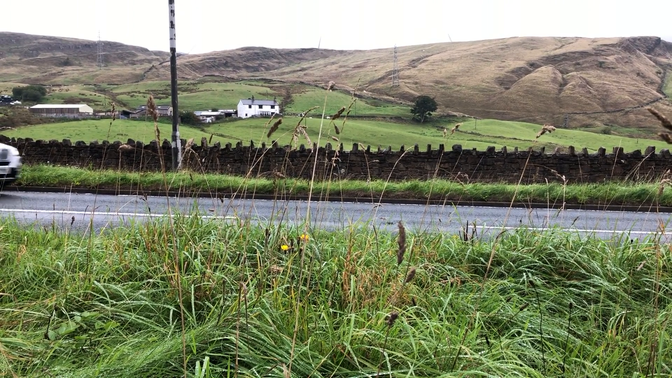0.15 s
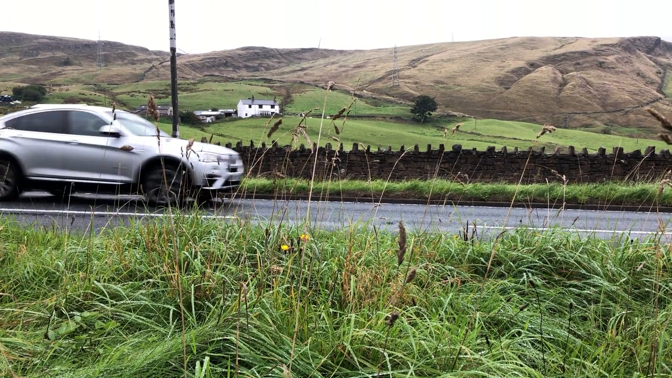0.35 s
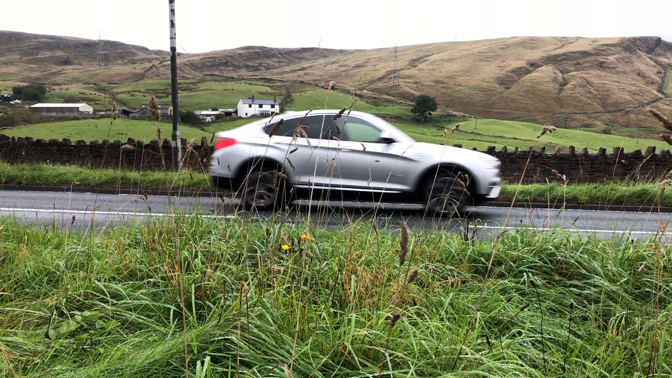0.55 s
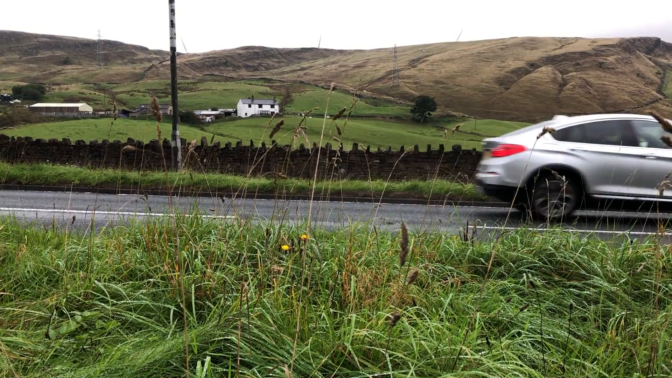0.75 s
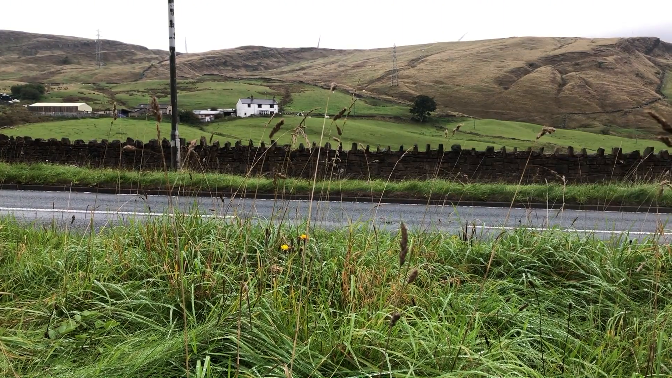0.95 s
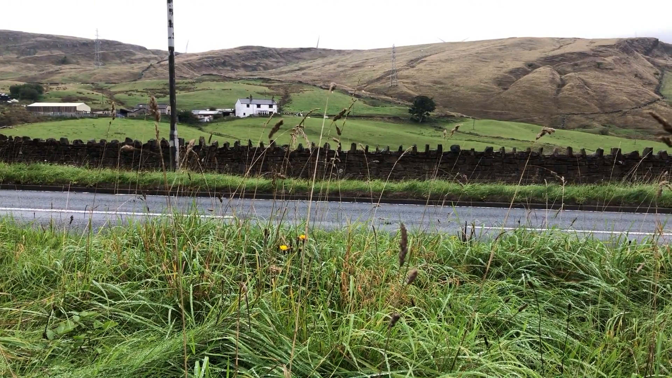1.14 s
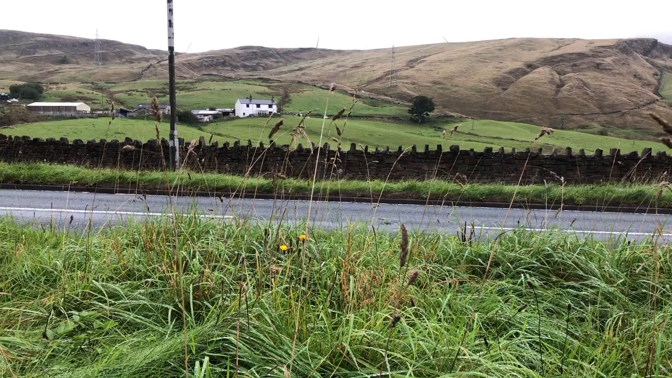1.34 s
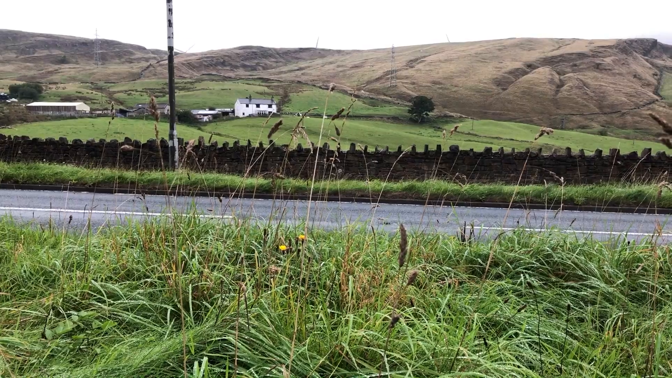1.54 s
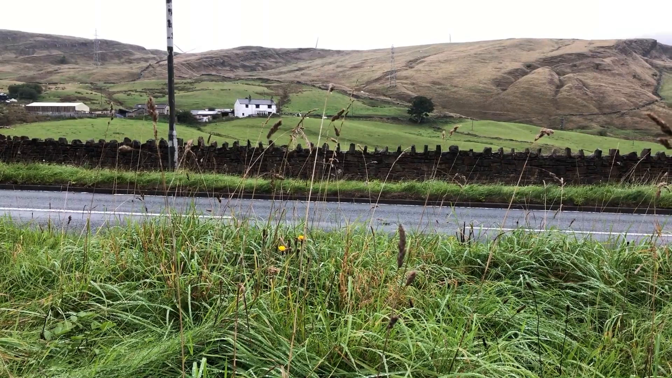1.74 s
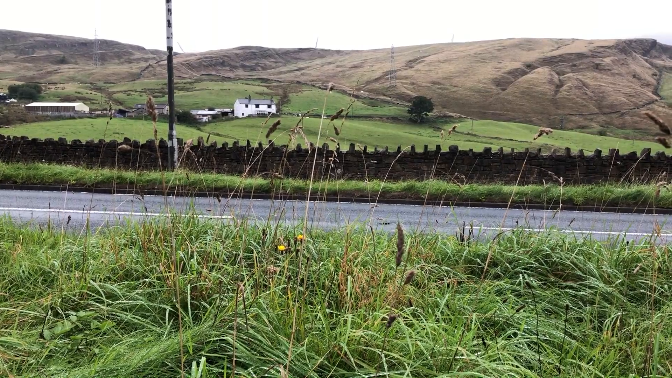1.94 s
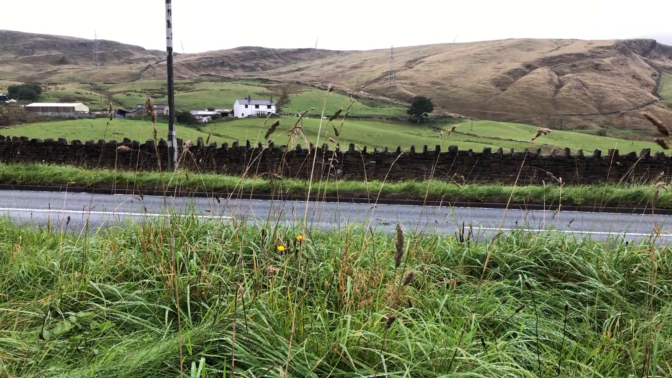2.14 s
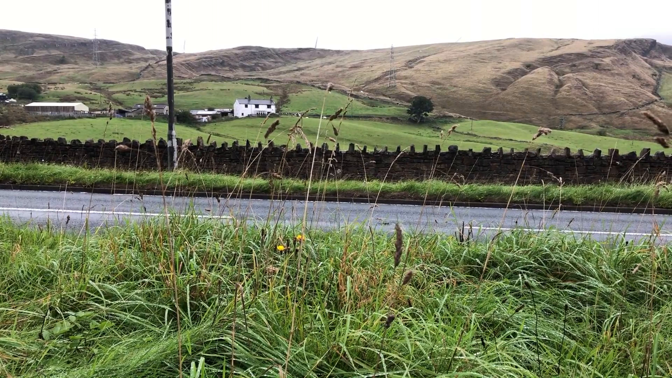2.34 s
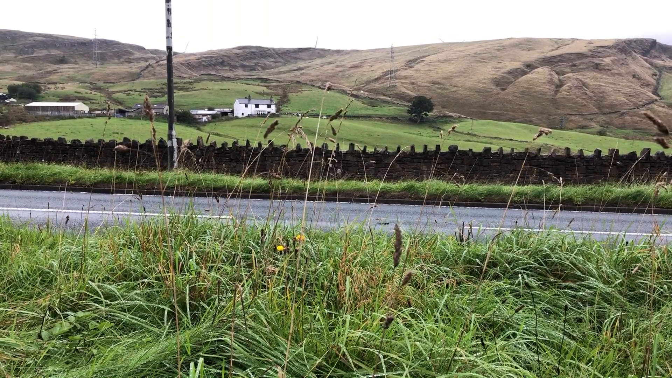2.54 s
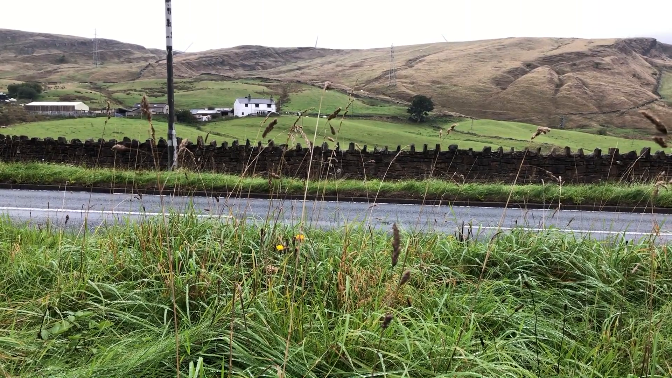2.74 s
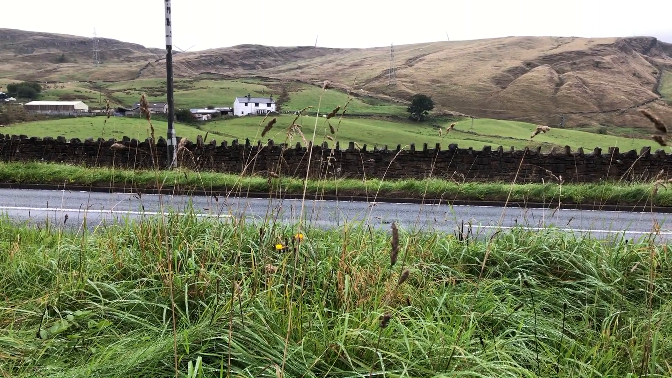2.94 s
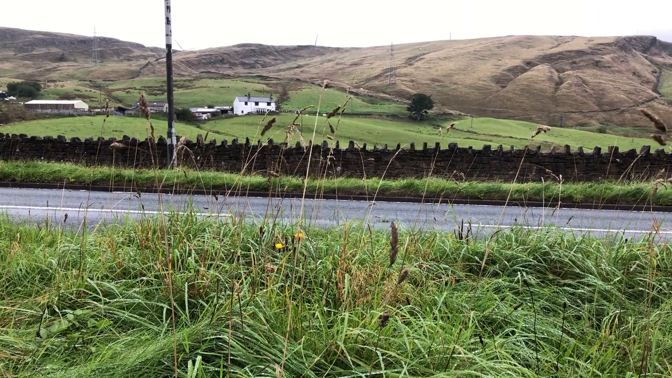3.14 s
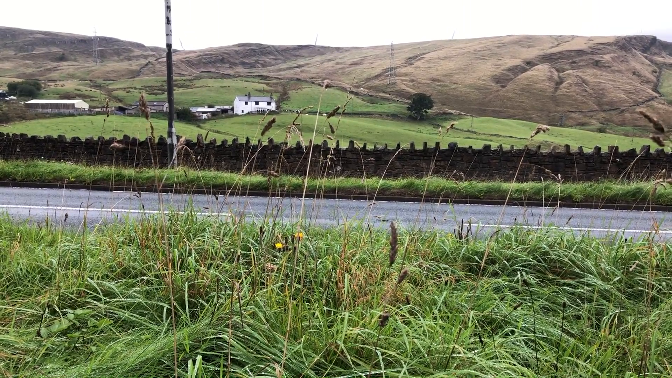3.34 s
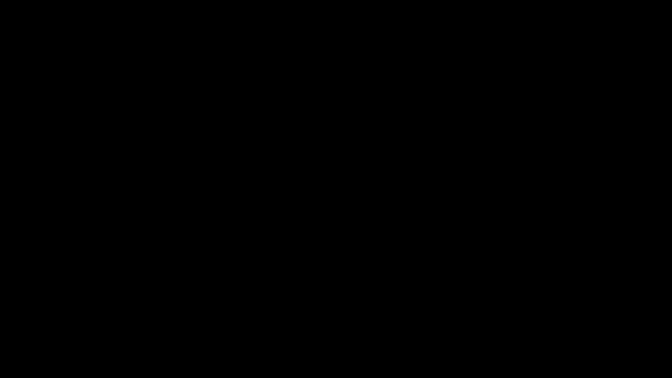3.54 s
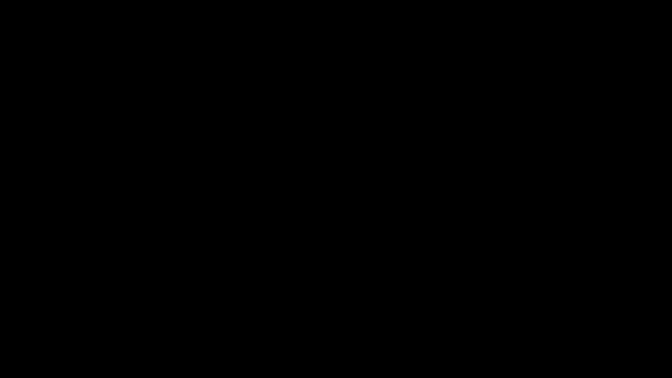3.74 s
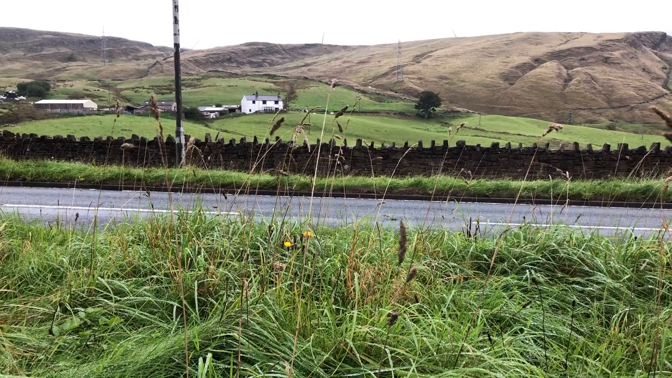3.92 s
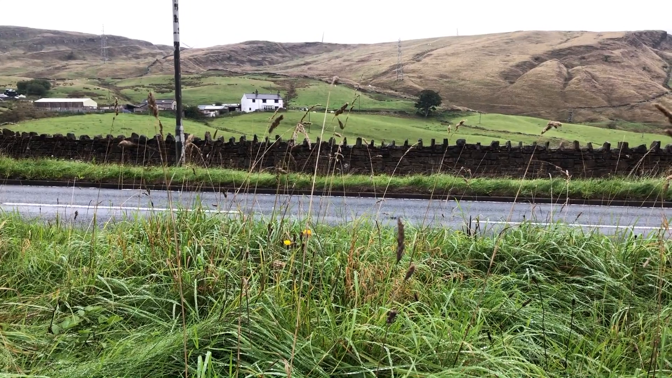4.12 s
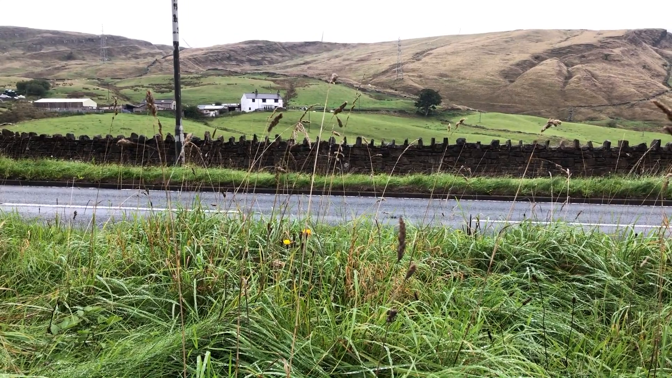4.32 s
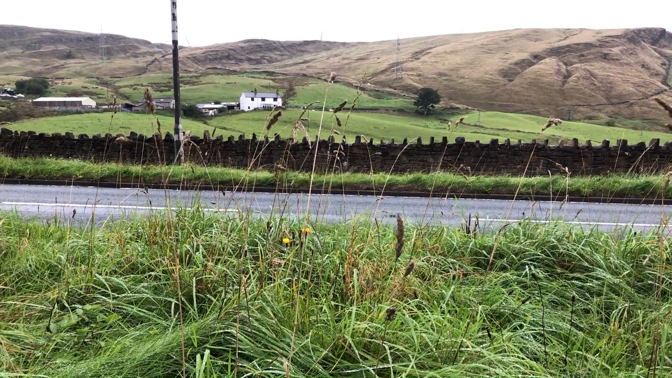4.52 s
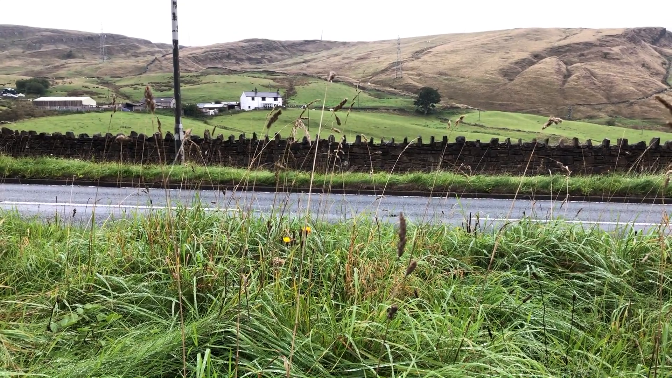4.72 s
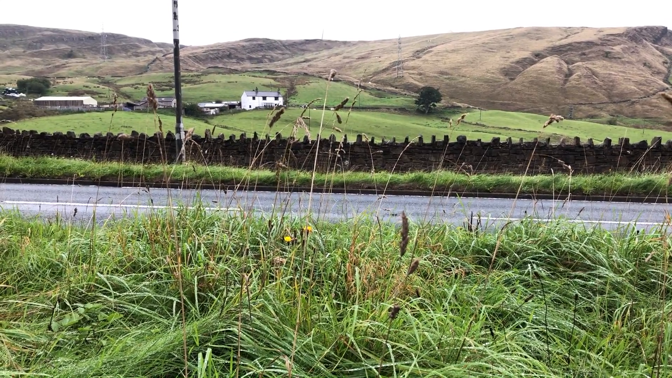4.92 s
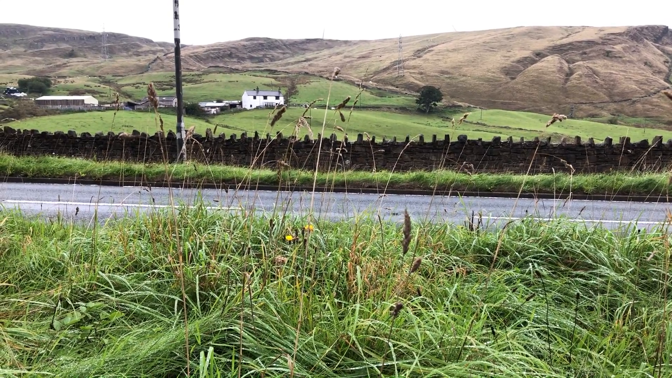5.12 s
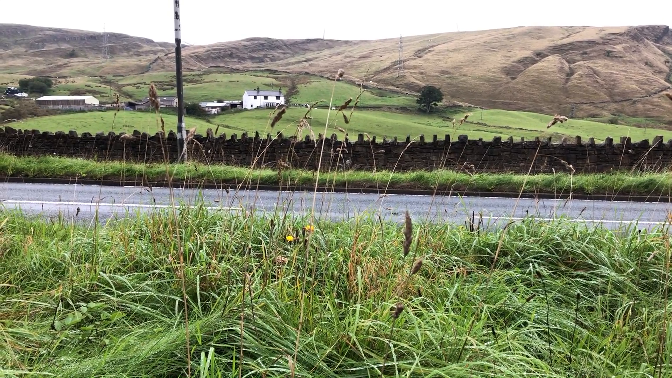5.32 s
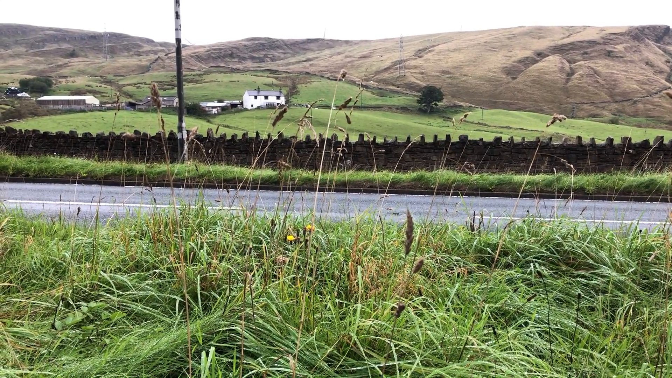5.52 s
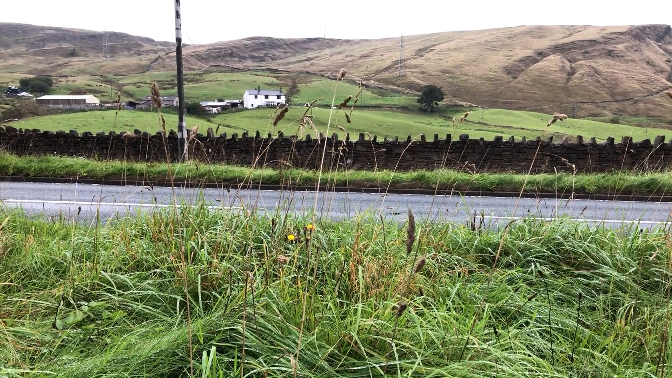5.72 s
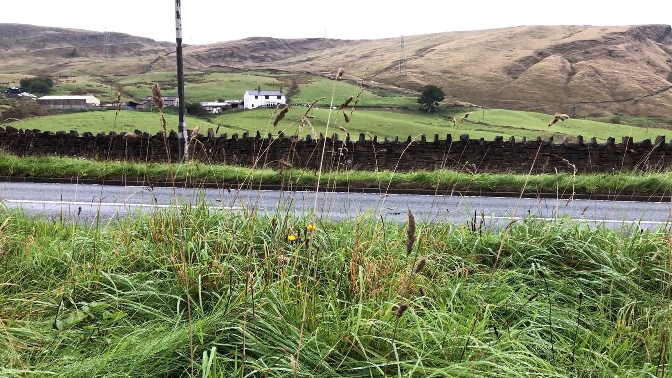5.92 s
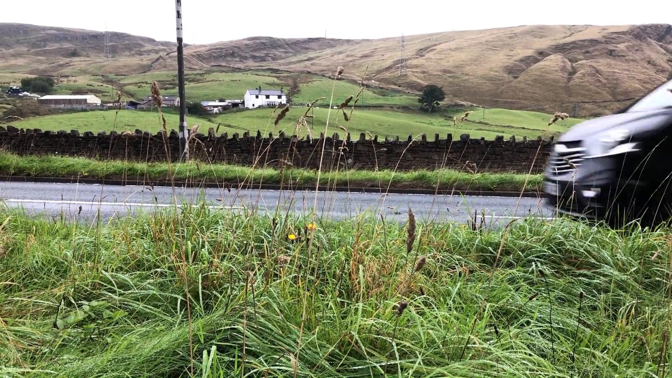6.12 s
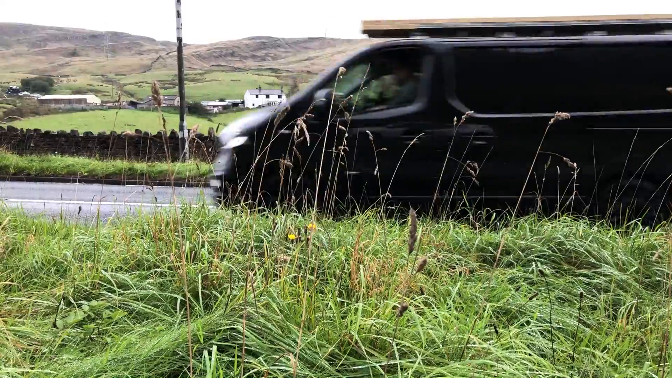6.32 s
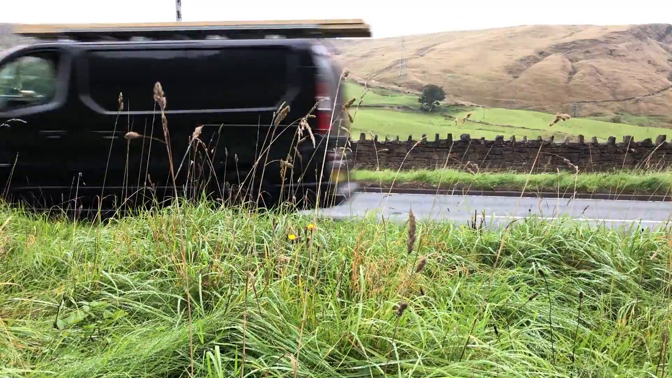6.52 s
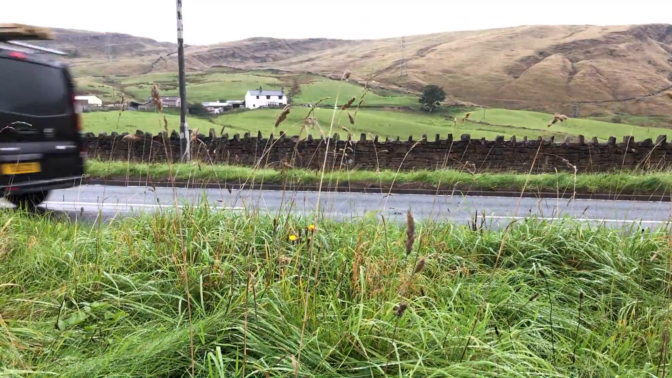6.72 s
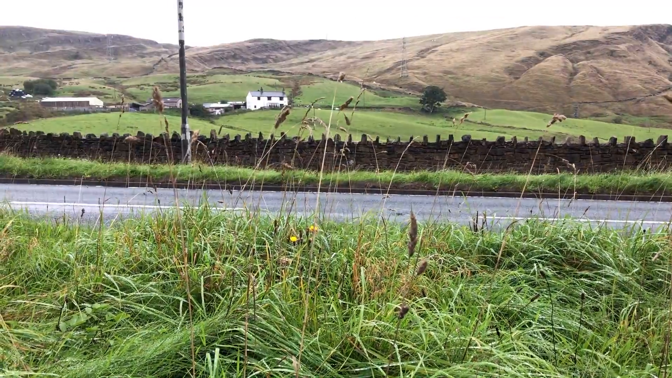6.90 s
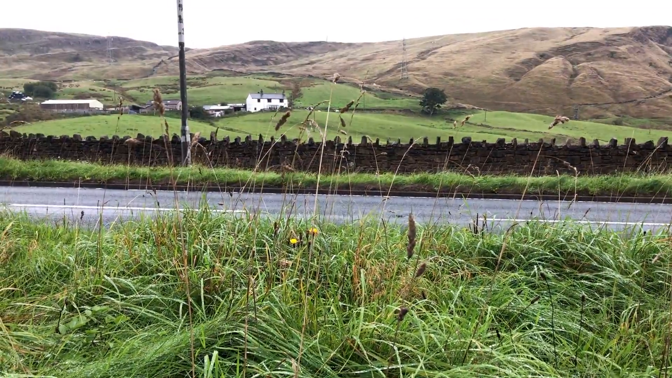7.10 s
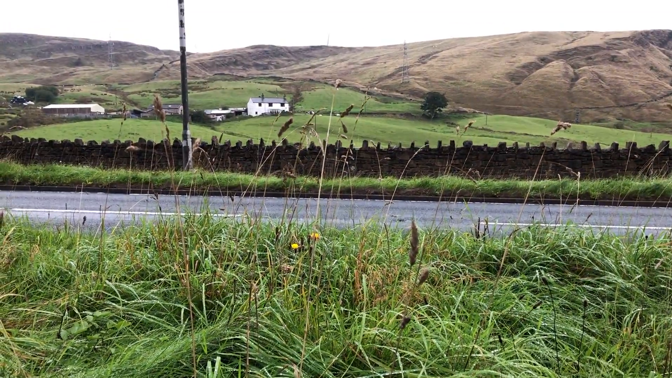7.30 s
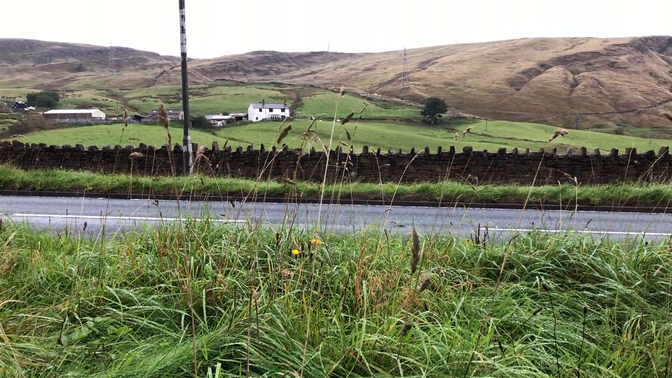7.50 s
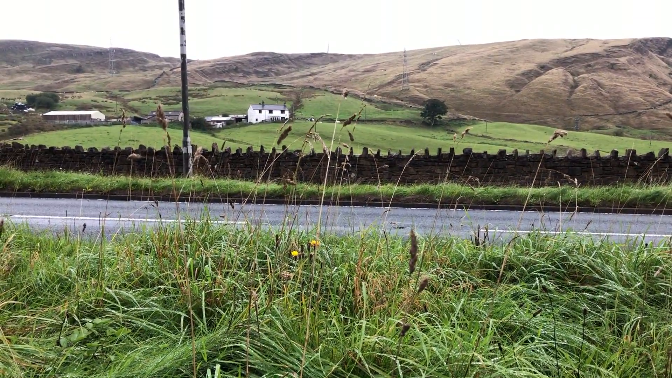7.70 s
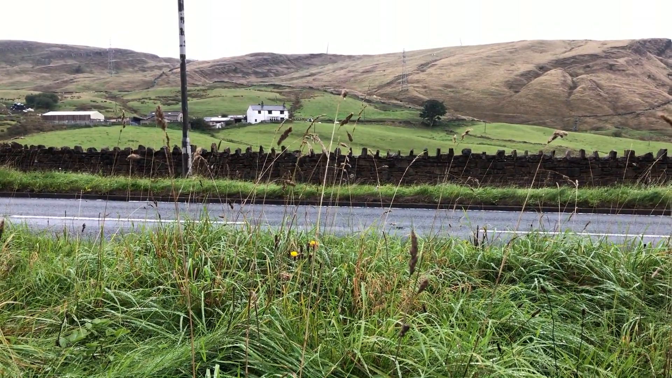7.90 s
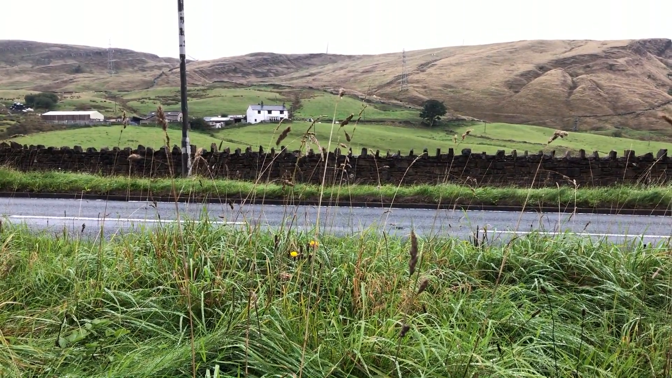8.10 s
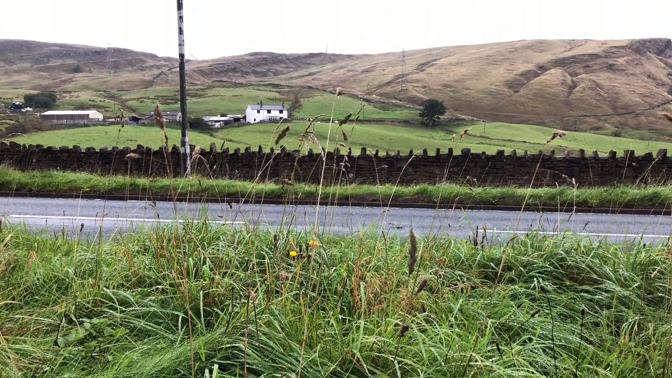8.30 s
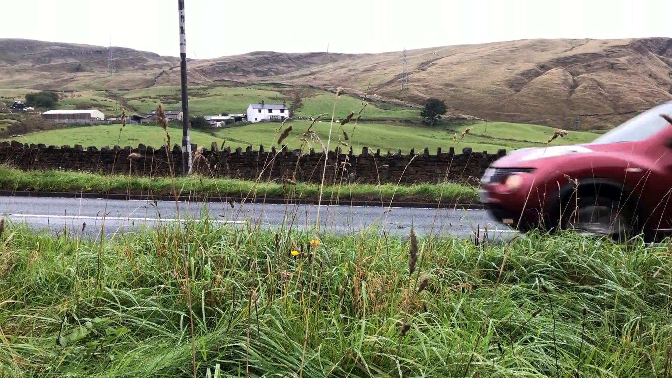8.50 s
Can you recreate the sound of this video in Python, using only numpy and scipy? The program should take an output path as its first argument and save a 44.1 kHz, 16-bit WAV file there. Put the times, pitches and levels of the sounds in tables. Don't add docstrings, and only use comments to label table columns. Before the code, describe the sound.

Roadside on wet tarmac: three vehicles in turn swish by with low rumble, droning engines and hissing spray, a few drops ticking between.

```python
import sys
import numpy as np
from scipy import signal
from scipy.io import wavfile
from scipy.ndimage import uniform_filter1d

SR = 44100
rng = np.random.default_rng(int(sys.argv[2]) if len(sys.argv) > 2 else 0)


def linear_from_db(decibels):
    return 10 ** (np.asarray(decibels, float) / 20)


def materialize(psi):
    bounded = np.clip(np.atleast_2d(psi).T, -1, 1)
    quanta = np.round(bounded * 32767).astype(np.int16)
    wavfile.write(sys.argv[1], SR, quanta)


N = 377055
STEP = 64
CAR, VAN, SECOND_CAR = 0, 1, 2


def drift(rate_hz, size):
    r = np.exp(-2 * np.pi * rate_hz * STEP / SR)
    slow = signal.lfilter([1], [1, -2 * r, r * r], rng.standard_normal(size + 1000))[1000:]
    return slow / slow.std()


# (abreast [s], speed [m/s], nearest distance [m])
PASSES = [
    (0.6, 19, 5.91),
    (6.45, 17, 5.8),
    (8.75, 19, 3.57),
]
# (time [s], size of the drop [dB], time scale of the step [s], negative =
LEVEL_STEPS = [
    (3.97, 8, .045),
    (4.27, 13, -.065),
    (0, 0, 1),
]


def heard_db(vehicle, rule, t):
    abreast_s, speed, near_m = PASSES[vehicle]
    step_s, step_db, fade_s = LEVEL_STEPS[vehicle]
    top_db, lag_s, coming, going, loss_db = rule
    since = t - abreast_s - lag_s
    spread_db = 10 * np.log10(1 + (speed * since / near_m) ** 2)
    power = np.where(since < 0, coming, going)
    lowered = .5 + .5 * np.tanh(.5 * (t - step_s) / fade_s)
    return top_db - power * spread_db - loss_db * np.abs(since) - step_db * lowered


def doppler_phase(vehicle, hz):
    sound_m_per_s = 343
    abreast_s, speed, near_m = PASSES[vehicle]
    along = speed * (np.arange(N) / SR - abreast_s)
    leaving_speed = speed * along / np.hypot(along, near_m)
    return 2 * np.pi * np.cumsum(hz / (1 + leaving_speed / sound_m_per_s)) / SR


def colour(since, hz, when, spectra):
    shades = []
    for points in spectra:
        point_hz, point_db = np.transpose(points)
        shades.append(np.interp(np.log(hz), np.log(point_hz), point_db))
    return np.array([np.interp(since, when, band) for band in np.transpose(shades)])


LAYER_EDGES = [55, 350, 780, 3000, 15500]


def vehicle_bands(vehicle, rules, roll, spray, t, hz, wide):
    join = np.searchsorted(hz, LAYER_EDGES[3]) - 1
    spray_joined = spray[join:] - spray[join] + roll[join]
    shape = np.r_[roll[:join], spray_joined] + 10 * np.log10(wide)[:, None]
    layer_of = np.clip(np.searchsorted(LAYER_EDGES, hz) - 1, 0, len(rules) - 1)
    lift = []
    for k, rule in enumerate(rules):
        layer_power = np.sum(linear_from_db(2 * shape[layer_of == k]), axis=0)
        lift.append(heard_db(vehicle, rule, t) - 10 * np.log10(layer_power))
    smooth_lift = uniform_filter1d(np.array(lift)[layer_of], size=5, axis=0, mode="nearest")
    return linear_from_db(2 * (shape + smooth_lift))


# (frequency [Hz], level [dB per Hz])
CAR_NEAR = [(18, -54), (30, -24), (49, -23), (92, -3), (140, -2), (180, -4), (240, 0), (404, -12.5),
            (595, -14), (926, -9), (1290, -11.5), (1930, -15), (3000, -27), (3900, -55), (6600, -120)]
CAR_LEAVING = [(18, -53), (30, -17), (53, -22), (92, -8.5), (210, -1), (286, -6), (353, -11.5), (595, -18),
               (874, -9), (1390, -9), (1720, -11.5), (2250, -21), (3000, -22.5), (3900, -54), (6600, -120)]
CAR_FAR = [(18, -45), (30, -16.5), (137, -11), (177, -6.5), (412, -19), (445, -24), (510, -21),
           (655, -22.5), (749, -10), (1060, -3.5), (1780, -9), (2470, -24), (3000, -21), (3900, -56),
           (6600, -120)]
SPRAY_CAR = [(1530, -30), (2600, 1), (3210, -5.5), (5460, -14.5), (8110, -15.5), (13600, -30.5),
             (15600, -38)]
SPRAY_CAR_FAR = [(1530, -30), (2600, 6), (3560, -7.5), (7470, -14), (9710, -20), (11000, -26), (14100, -29),
                 (15600, -36)]
CAR_COLOUR_S = [.1, .7, 1.4, 2.2]
CAR_SPRAY_S = [.3, 2.1]
# (loudest level [dB], time after abreast [s], spreading power coming, same going, further loss [dB/s])
CAR_LAYERS = [
    (-21, 0.037, 0.089, 0.76, 4),
    (-26.0, 0.02, 0.57, 1.58, 0.0),
    (-21.5, 0.076, 0.04, 1.117, 0.0),
    (-37.5, 0.01, 0.65, 0.84, 2.5),
]


def car_tyres(t, hz, wide):
    since = t - PASSES[CAR][0]
    roll = colour(since, hz, CAR_COLOUR_S, [CAR_NEAR, CAR_LEAVING, CAR_LEAVING, CAR_FAR])
    spray = colour(since, hz, CAR_SPRAY_S, [SPRAY_CAR, SPRAY_CAR_FAR])
    return vehicle_bands(CAR, CAR_LAYERS, roll, spray, t, hz, wide)


# (frequency [Hz], level [dB per Hz])
VAN_COMING = [(18, -38), (30, -19), (71, -1.5), (167, 1), (309, -2), (360, -16), (472, -14), (606, -20),
              (655, -17), (874, -17.5), (1360, -15), (1560, -12), (3000, -31.5), (3900, -57), (6600, -120)]
VAN_CLOSING = [(38, -30), (64, -3), (97, -4), (139, -3.5), (256, -3.5), (320, -3), (376, -16.5),
               (456, -11.5), (600, -17), (941, -8.5), (1120, -10.5), (1500, -8.5), (3000, -24), (3900, -55),
               (6600, -120)]
VAN_NEAR = [(18, -53), (30, -35), (50, -15.5), (154, 2), (191, -3.5), (360, -7), (490, -1), (655, -9),
            (944, -7), (1060, -14.5), (1420, -13.5), (1960, -21.5), (3000, -25), (3900, -53), (6600, -120)]
VAN_LEAVING = [(18, -55), (30, -25), (49, -20), (135, -1.5), (231, -1.5), (265, -5.5), (520, -10),
               (583, -13.5), (944, -13.5), (1020, -9.5), (1440, -14), (1750, -12), (3000, -25.5),
               (3900, -51), (6600, -120)]
VAN_GONE = [(18, -50), (30, -26), (82, -3.5), (194, -4), (231, -3), (297, -5), (334, -10.5), (404, -14),
            (445, -13.5), (667, -17), (908, -13), (1290, -11), (3000, -28.5), (3900, -56), (6600, -120)]
SPRAY_COMING = [(1530, -30), (2600, 5), (3720, -14), (5290, -18.5), (6430, -17), (7470, -22), (9710, -26),
                (15600, -39)]
SPRAY_CLOSING = [(1530, -30), (2600, 0), (3400, -6), (3750, -10), (5500, -13), (6100, -13), (9420, -18.5),
                 (15600, -32)]
SPRAY_VAN = [(1530, -30), (2600, 2.5), (4910, -9), (6100, -13), (6980, -11), (9490, -15.5), (11400, -22),
             (15600, -30)]
SPRAY_GONE = [(1530, -30), (2600, 0), (3560, -5), (5260, -7.5), (5660, -8), (8420, -11), (14100, -31),
              (15600, -35)]
VAN_COLOUR_S = [-1.1, -0.8, 0.095, 0.09, 0.39, 0.93]
VAN_SPRAY_S = [-1.0, -0.84, -.25, -0.13, 0.39, .85]
# (loudest level [dB], time after abreast [s], spreading power coming, same going, further loss [dB/s])
VAN_LAYERS = [
    (-22, 0.0051, 1.26, 1.27, -0.5),
    (-27.5, 0.019, 1.79, 1.93, 0.0),
    (-22, 0.0031, 0.54, 0.53, 8.0),
    (-35.5, 0.22, 0.5, 0.74, 7.5),
]


def van_tyres(t, hz, wide):
    since = t - PASSES[VAN][0]
    rolls = [VAN_COMING, VAN_CLOSING, VAN_NEAR, VAN_NEAR, VAN_LEAVING, VAN_GONE]
    sprays = [SPRAY_COMING, SPRAY_CLOSING, SPRAY_CLOSING, SPRAY_VAN, SPRAY_VAN, SPRAY_GONE]
    roll = colour(since, hz, VAN_COLOUR_S, rolls)
    spray = colour(since, hz, VAN_SPRAY_S, sprays)
    return vehicle_bands(VAN, VAN_LAYERS, roll, spray, t, hz, wide)


# (frequency [Hz], level [dB per Hz])
SECOND_NEAR = [(18, -58), (30, -28), (90, -9), (130, -3.5), (173, 2), (206, -4.5), (231, -3), (286, -4.5),
               (397, -15), (694, -15.5), (764, -10), (1060, -5.5), (3000, -25), (3900, -57), (6600, -120)]
SPRAY_SECOND = [(1530, -29), (2600, 2), (3840, -11), (4950, -11.5), (5580, -12.5), (8880, -17),
                (12200, -26), (15600, -35)]
SECOND_COLOUR_S = [-1, -0.23]
SECOND_SPRAY_S = [-.85, -.35]
# (loudest level [dB], time after abreast [s], spreading power coming, same going, further loss [dB/s])
SECOND_LAYERS = [
    (-21.5, -0.11, 0.74, 1.0, 3),
    (-31, -0.31, 1.03, 0.04, 0.5),
    (-24, -0.17, 0.8, 1.0, 0.6),
    (-41, -0.06, 0.67, 1.0, 2.5),
]


def second_car_tyres(t, hz, wide):
    since = t - PASSES[SECOND_CAR][0]
    roll = colour(since, hz, SECOND_COLOUR_S, [VAN_GONE, SECOND_NEAR])
    spray = colour(since, hz, SECOND_SPRAY_S, [SPRAY_GONE, SPRAY_SECOND])
    return vehicle_bands(SECOND_CAR, SECOND_LAYERS, roll, spray, t, hz, wide)


def droplets(per_s, spread_db, share):
    sizes = linear_from_db(spread_db * np.minimum(rng.exponential(1, N), 4)) * rng.choice([-1, 1], N)
    clicks = sizes * (rng.random(N) < per_s / SR)
    hiss = rng.standard_normal(N)
    return np.sqrt(share) * clicks / clicks.std() + np.sqrt(1 - share) * hiss


# (time [s], extra spray [dB], length [s])
PUDDLES = [(1.29, -1.5, .03), (1.483, 2, .03), (2.086, 1.5, .03), (2.263, 3, 0.023), (2.397, 3, .02),
           (2.64, 2, .03), (2.87, -3, 0.33), (3.45, 1.5, .3), (3.032, 1, .02), (3.11, 0.5, .04),
           (3.518, 2.5, .03), (3.578, 2.5, .03), (3.837, 2, 0.022), (3.899, 1, 0.017), (5.809, 1.5, .02),
           (6.417, 0.5, .02), (6.598, 2.5, 0.021), (6.776, 2.5, 0.028), (6.956, 4, .035),
           (7.137, 4.5, 0.028), (7.646, 3.5, 0.032), (7.694, 3.5, 0.019), (7.85, 2.5, .04), (8.061, 2, .02)]


def tyres(flicker_db, gust_db, patch_db, wet_hz):
    t = np.arange(N // STEP + 2) * STEP / SR
    edges = np.geomspace(84, 15960, 58) - 60
    hz = np.sqrt(edges[1:] * edges[:-1])
    wide = np.diff(edges)
    power = car_tyres(t, hz, wide) + van_tyres(t, hz, wide) + second_car_tyres(t, hz, wide)
    surge = gust_db * (drift(6.8, len(t)) + 0.28 * drift(25.0, len(t)))
    for s, extra_db, length in PUDDLES:
        surge += extra_db * np.exp(-.5 * ((t - s) / (.5 * length)) ** 2)
    dry_noise = rng.standard_normal((2, N + SR))
    wet_noise = [droplets(per_s=2500, spread_db=3.5, share=0.28) for _ in dry_noise]
    out = np.zeros(N)
    for k, level in enumerate(10 * np.log10(power)):
        wetness = 1 / (1 + (wet_hz / hz[k]) ** 4)
        source = wet_noise[k % 2] if hz[k] > wet_hz else dry_noise[k % 2]
        sos = signal.butter(3, edges[k:k + 2], "band", fs=SR, output="sos")
        band = signal.sosfilt(sos, source)[-N:]
        patches = patch_db * (1 - wetness) * drift(3.8, len(t))
        flicker = flicker_db * drift(17.0, len(t))
        gain = linear_from_db(level + patches + wetness * (surge + flicker))
        out += np.interp(np.arange(N) / STEP, np.arange(len(t)), gain) * band / band.std()
    return out


# ((frequency at the source [Hz], width [Hz]), (loudest level [dB],
# time after abreast [s], spreading power coming, same going, further loss [dB/s]))
CAR_HUMS = [
    ((208, 18), (-28, 0.3, 3, 2, 3)),
    ((908, 79), (-29, -0.26, 3.5, 2.5, .5)),
]
VAN_HUMS = [
    ((1480, 200), (-34.5, -0.2, 1, 6, 3)),
    ((905, 87), (-29, .0, 9, 3, 5.0)),
]


def tyre_hums(vehicle, rows):
    out = np.zeros(N)
    for (hz, wide_hz), rule in rows:
        sos = signal.butter(2, wide_hz / 2, fs=SR, output="sos")
        sway = signal.sosfilt(sos, rng.standard_normal((2, N + SR)))[:, SR:]
        phase = doppler_phase(vehicle, hz)
        tone = sway[0] * np.cos(phase) + sway[1] * np.sin(phase)
        out += linear_from_db(heard_db(vehicle, rule, np.arange(N) / SR)) * tone / sway.std()
    return out


FIRING_HZ = [101, 65.1, 90.5]
# (loudest level [dB], time after abreast [s], spreading power coming, same going, further loss [dB/s])
FIRING = [
    (-28, -0.039, 2.5, 1.7, .5),
    (-33.5, -.05, 1.36, 1.5, 1.5),
    (-37.5, -0.46, 1.0, 2.5, 0.34),
]
# (multiple of the firing rate, level [dB])
CAR_ORDERS = [(1, -3.5), (2, -13.5)]
VAN_ORDERS = [(1, -3.5), (2, -5.5)]
SECOND_ORDERS = [(1, 2), (2, -9.5), (3, -2.5)]


def engine(vehicle, orders, wobble_db):
    level_db = heard_db(vehicle, FIRING[vehicle], np.arange(N) / SR)
    phase = doppler_phase(vehicle, FIRING_HZ[vehicle])
    out = np.zeros(N)
    for multiple, db in orders:
        waver = np.repeat(drift(1.74, N // STEP + 1), STEP)[:N]
        out += linear_from_db(level_db + db + wobble_db * waver) * np.sin(round(multiple) * phase)
    return np.sqrt(2) * out


# (time [s], peak level [dB], centre [Hz], width [Hz])
DROPS = [
    (2.608, -31, 2600, 500),
    (2.608, -38, 4500, 3000),
    (2.6085, -45, 7000, 2500),
    (2.609, -50, 12000, 7000),
    (2.62, -52, 6700, 800),
    (2.652, -49, 7000, 600),
    (3.025, -52, 7900, 1800),
    (3.096, -51, 8200, 2200),
    (3.113, -47, 7700, 1500),
    (3.125, -55, 7800, 1200),
]


def drops():
    t60_s, rise_s = .013, .0005
    out = np.zeros(N)
    t = np.arange(SR // 20) / SR
    for s, peak_db, hz, wide in DROPS:
        burst = linear_from_db(-60 * t / t60_s) * np.minimum(t / rise_s, 1) * rng.standard_normal(len(t))
        sos = signal.butter(2, [hz - wide / 2, hz + wide / 2], "band", fs=SR, output="sos")
        tick = signal.sosfilt(sos, burst)
        out[round(s * SR):][:len(t)] += linear_from_db(peak_db) * tick / np.abs(tick).max()
    return out


def scene():
    mix = tyres(flicker_db=0.88, gust_db=0.3, patch_db=1.1, wet_hz=2170)
    mix += tyre_hums(CAR, CAR_HUMS) + tyre_hums(VAN, VAN_HUMS)
    mix += engine(CAR, CAR_ORDERS, wobble_db=4.5)
    mix += engine(VAN, VAN_ORDERS, wobble_db=2.5)
    mix += engine(SECOND_CAR, SECOND_ORDERS, wobble_db=4.0)
    mix += drops()
    return mix[None]


def low_pass(x):
    return signal.sosfilt(signal.butter(12, 15710, fs=SR, output="sos"), x)


def record(dry):
    mix = 0.81 * np.tanh(dry / 0.79)
    return low_pass(mix)


dry = scene()
out = record(dry)
materialize(out)
```